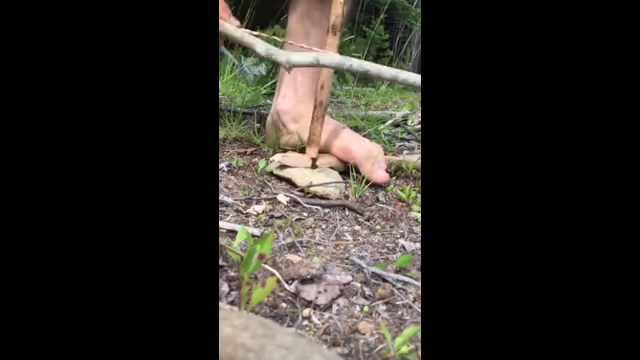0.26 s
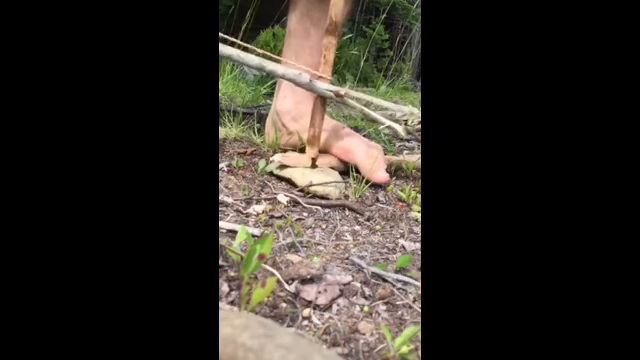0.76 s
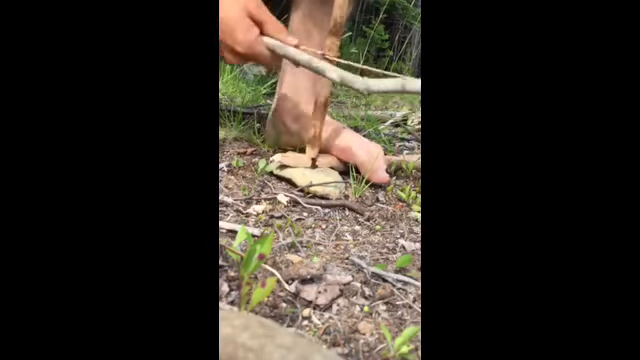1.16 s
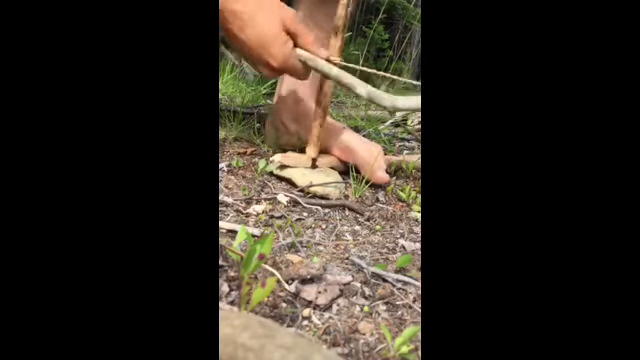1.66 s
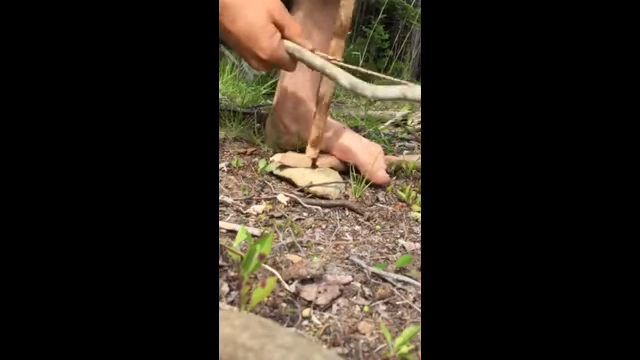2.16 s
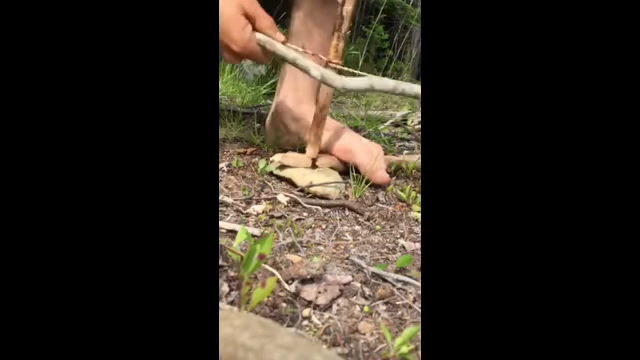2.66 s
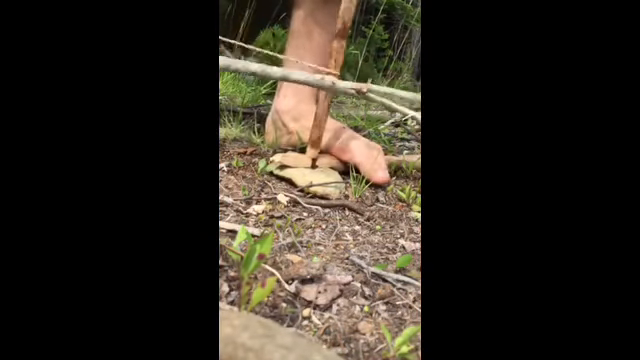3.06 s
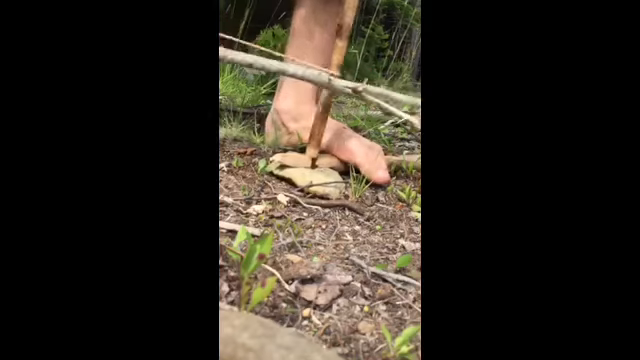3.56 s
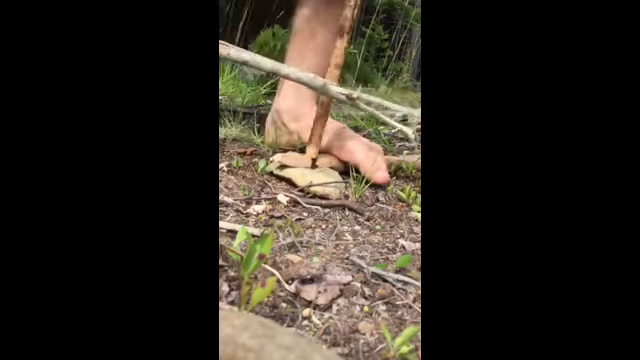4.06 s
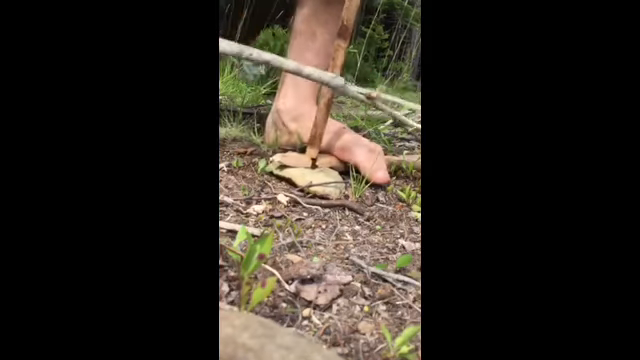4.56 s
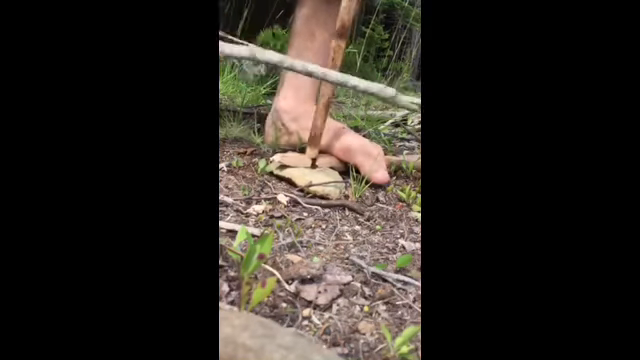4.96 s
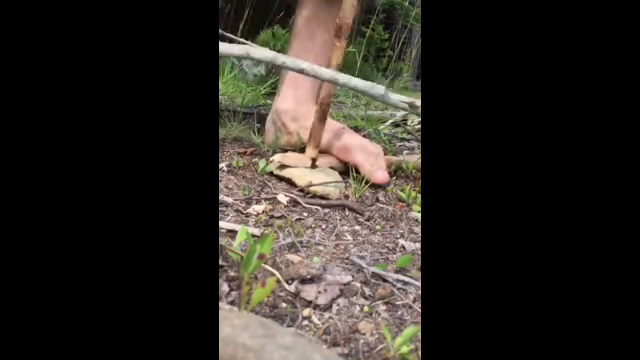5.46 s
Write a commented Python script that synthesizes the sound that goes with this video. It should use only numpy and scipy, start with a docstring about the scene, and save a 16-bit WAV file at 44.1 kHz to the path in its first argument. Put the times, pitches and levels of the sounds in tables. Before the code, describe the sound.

A bow drill worked quickly, heard very near and in mono. Four piercing squeaks come in the opening second and a half, with slower uneven strokes; then a regular scrubbing grind takes over, pulls harsher than pushes, pausing for an instant at each turn. Underneath are fluttering low thrums; late strokes end in loose wooden clacks. The woodland around is quiet, with barely any echo.

```python
"""Woodland, close by: a bow drill turns a wooden spindle in a hearth board, about four strokes a second.
Early on the smooth tip squeals by stick-slip at the spindle's resonance, later it only chirps.
Dry grinding stops at each turn of the bow: random slips excite wood resonances and hiss in the dust.
The wobbling spindle thrums the bow and board, rattles and knocks in its socket, and crumbs of wood crack.
The cord creaks, and faint echoes from trunks and still air lie behind, as filtered noise."""
import sys
import numpy as np
from scipy import signal
from scipy.fft import rfft, irfft
from scipy.io import wavfile

SR = 44100
rng = np.random.default_rng(int(sys.argv[2]) if len(sys.argv) > 2 else 0)


def materialize(psi):
    """Save the field psi as 16-bit PCM at rate SR to the path in sys.argv[1].

    A 1-D psi becomes a single channel; in a 2-D psi each row is a channel.
    """
    bounded = np.clip(np.atleast_2d(psi).T, -1, 1)
    quanta = np.round(bounded * 32767).astype(np.int16)
    wavfile.write(sys.argv[1], SR, quanta)


N = 251811


def undb(db):
    """Logarithmic level: decibels to amplitude gain."""
    return 10 ** (np.asarray(db) / 20)


def unit(x):
    """Power normalisation: scale to an rms of 1."""
    return x / np.sqrt(np.mean(x ** 2))


def clock():
    """Uniform sampling: the time of every sample in seconds."""
    return np.arange(N) / SR


def filtered(x, order, hz, kind="low"):
    """Linear filtering: a Butterworth response with its edge or edges at hz."""
    return signal.sosfilt(signal.butter(order, hz, kind, fs=SR, output="sos"), x)


def walk(rate):
    """Band-limited noise: a smooth random course of rms 1, varying up to about `rate` times a second."""
    return unit(filtered(rng.standard_normal(N), 2, rate))


def ring(x, hz, width):
    """Simple resonance: a second-order peak with gain 1 at its centre."""
    return signal.lfilter(*signal.iirpeak(hz, hz / width, fs=SR), x)


def body(x, modes):
    """Modal superposition: resonances (frequency, width, level) driven by one force."""
    return sum(undb(db) * ring(x, hz, width) for hz, width, db in modes)


def ring_through(x, hz, width):
    """Resonance of moving pitch: kicks of random phase build up a slow complex swing on a carrier."""
    kicks = x * np.exp(2j * np.pi * rng.random(N))
    swing = filtered(kicks, 1, width / 2)
    swing = filtered(swing, 1, 420)
    carrier = np.exp(2j * np.pi * np.cumsum(hz) / SR)
    return unit(np.real(swing * carrier))


def colour(x, points):
    """Spectral shaping: gain interpolated over log frequency between (frequency, level) points."""
    hz, db = np.transpose(points)
    bins = np.maximum(np.fft.rfftfreq(N, 1 / SR), 1)
    gain = undb(np.interp(np.log(bins), np.log(hz), db))
    return irfft(rfft(x) * gain, N)


def grains(rate, spread_db):
    """Shot noise: random clicks, about `rate` a second, of unequal size."""
    hits = rng.random(N) < rate / SR
    return hits * rng.standard_normal(N) * undb(spread_db * rng.standard_normal(N))


def burst(start, decay):
    """Exponential decay: a dying spray of noise from a sudden start."""
    age = clock() - start
    return (age >= 0) * np.exp(-np.abs(age) / decay) * rng.standard_normal(N)


# Bow strokes, push and pull in turn: (start [s], end [s], pressure [dB])
BOW_STROKES = [(-0.12, 0.126, 0), (0.171, 0.454, -2), (0.541, 0.829, -4), (0.886, 1.145, -2.5),
               (1.181, 1.433, -4), (1.501, 1.742, 0), (1.758, 2.009, .5), (2.029, 2.275, 0),
               (2.298, 2.547, 0.4), (2.563, 2.813, -0.5), (2.833, 3.074, .5), (3.107, 3.336, 0),
               (3.356, 3.602, 0), (3.621, 3.838, 0), (3.868, 4.119, 0), (4.138, 4.353, 0),
               (4.386, 4.617, .5), (4.644, 4.85, -.5), (4.877, 5.093, 0), (5.116, 5.322, -0.5),
               (5.344, 5.575, -0.5), (5.584, 5.802, -1)]


def bow():
    """Reciprocating drive: relative speed (0 at each turn of the bow), pull flag and pressure in dB."""
    t, speed, pulled, pressure_db = clock(), np.zeros(N), np.zeros(N), np.zeros(N)
    fastest = .53  # share of the stroke elapsed when the bow is fastest
    for k, (start, end, db) in enumerate(BOW_STROKES):
        on = (t > start) & (t < end)
        u = (t[on] - start) / (end - start)
        # warp the stroke so that the half-sine peaks at the fastest moment
        warped = u * (1 - fastest) / (u * (1 - fastest) + fastest * (1 - u))
        speed[on] = np.sin(np.pi * warped)
        pulled[on], pressure_db[on] = k % 2, db
    return speed, pulled, pressure_db


def turns(speed, top_hz):
    """Rotational modulation: the tip's lean presses once a turn, its oval shape twice a turn."""
    turns_hz = top_hz * speed ** .25 * (1 + .05 * walk(12))
    phase = 2 * np.pi * np.cumsum(turns_hz) / SR
    return 0.54 * np.cos(phase) + 1.0 * np.cos(2 * phase + 1)


# Part levels as the socket wears: (time [s], rattle [dB re thrum force], wood [dB], thrum [dB])
SOCKET_WEAR = [(0, -15, 0.5, -8), (0.698, -24, -3.5, -13.5), (1.551, -21, -2, -0.5), (3.5, -20, -1.5, 0.5),
               (5.3, -19.5, 1, 2)]


def wear():
    """Slow parameter drift: rattle, wood and thrum levels in dB, straight lines between the points."""
    s, *columns = np.transpose(SOCKET_WEAR)
    return [np.interp(clock(), s, c) for c in columns]


# Moments late in a pull when the cord slips on the spindle: (time [s])
CORD_SLIP_TIMES = [3.739, 4.32, 4.812, 5.276]


def slackening(slip_db=-9):
    """Loss of traction: a slipping cord lowers the force until just after the stroke ends."""
    t, loss_db = clock(), np.zeros(N)
    for s in CORD_SLIP_TIMES:
        end = min(stroke[1] for stroke in BOW_STROKES if stroke[1] > s)
        loss_db += slip_db * np.interp(t, [s - .004, s + .004, end, end + .02], [0, 1, 1, 0])
    return undb(loss_db)


def friction(speed, start_share, end_share):
    """Sliding friction: rubbing bites as soon as the tip moves, grows with speed and tapers as it slows."""
    moving = np.tanh(speed / .06)
    # part of the force that does not depend on speed
    share = np.where(np.gradient(speed) > 0, start_share, end_share)
    return moving * (share + (1 - share) * speed)


# Resonances of spindle and board:
# (frequency [Hz], width [Hz], level when pushed [dB], level when pulled [dB])
WOOD_MODES = [(1420, 42, -1.5, 1.5), (1527, 130, -5.5, -4.5), (2057, 93, -5.5, 1), (3070, 250, -1, -3),
              (4433, 270, -1, -3), (5574, 134, 2.5, 3.5), (8700, 830, 3, -1.5), (12690, 990, -10.5, -9.5)]
# Spectrum of the hiss in the wood dust:
# (frequency [Hz], level when pushed [dB], level when pulled [dB])
DUST_HISS = [(298, -13.5, -25), (800, -24.5, -32), (1200, -14, -22.5), (2210, -6, -8), (2215, -16, -24),
             (4100, -13.5, -12.5), (5280, -5.5, -16.5), (6000, -4.5, -11), (9600, -8, -9.5),
             (12400, -6.5, -7.5), (14000, -11.5, -19), (16000, -11.5, -12)]


def grinding(speed, pulled, bumps, gain, wood_db):
    """Random friction excitation: tiny slips ring the wood and hiss in dust, coloured by the lean each way."""
    pressure = undb(1.1 * bumps + 1.0 * walk(90) + 1.0 * walk(22))
    slips = unit(grains(6000 + 12000 * speed, spread_db=1.5)) * pressure * gain
    # dust hisses from the first movement; the wood needs more speed
    wood_force = friction(speed, start_share=.25, end_share=0.19) * undb(wood_db + 0.85 * walk(30))
    dust_force = friction(speed, start_share=0.58, end_share=0.56)
    out = 0
    for way, share in enumerate([1 - pulled, pulled]):
        modes = np.array(WOOD_MODES)[:, [0, 1, 2 + way]]
        dust = np.array(DUST_HISS)[:, [0, 1 + way]]
        out = out + body(slips * share * wood_force, modes)
        # random signs make the hiss independent of the wood sound
        out = out + colour(slips * share * dust_force * rng.choice([-1, 1], N), dust)
    return out


def stick_slip(swing, hz, bumps, chatter, second_db, third_db, fourth_db=-42):
    """Stick-slip oscillation: pressure bends the pitch, overtones grow with the limited swing."""
    waver_hz = 12 * walk(35) + 7 * walk(160) - 14 * bumps
    phase = 2 * np.pi * np.cumsum(hz + waver_hz) / SR
    # extra chatter before the squeal locks; it fades as the swing grows past about -30.5 dB
    chatter = chatter + 0.4 * np.exp(-swing / undb(-30.5))
    # missed slips shake both the swing and its phase
    shake_in = unit(ring(walk(130), 82, 81))
    shake_across = unit(ring(walk(200), 110, 44))
    shake = 1 + chatter * (shake_in + .6j * shake_across) / np.sqrt(2)
    swing, phase = swing * np.abs(shake), phase + np.angle(shake)
    limit = .54  # largest rms swing that friction can feed
    swing = swing / (1 + (swing / limit) ** 6) ** (1 / 6)
    flutter_db = 4.5  # random spread of each overtone's level
    overtones = 0
    for k, db in enumerate([second_db, third_db, fourth_db], 2):
        level = undb(db + flutter_db * walk(55))
        overtones = overtones + level * np.sin(k * phase + 0.37 * walk(140))
    return np.sqrt(2) * swing * (np.sin(phase) + overtones * (swing / 0.5) ** 0.27)


# Squeals of the polished tip, one curve for each of four early strokes:
# (time [s], pitch before waver [Hz], level before throb and chatter [dB])
SQUEAL_CURVES = [
    [(0.19, 3360, -51), (0.224, 3330, -32.5), (0.248, 3296, -34.5), (0.272, 3286, -11), (0.282, 3241, -6.5),
     (0.384, 3270, -10.5), (0.4, 3286, -18.5), (0.428, 3316, -18), (0.46, 3323, -56)],
    [(0.58, 3390, -52), (0.638, 3198, -16.5), (0.678, 3242, -25), (0.692, 3216, -15.5), (0.736, 3215, -24),
     (0.754, 3213, -13), (0.79, 3295, -30.5), (0.814, 3246, -22.5), (0.84, 3230, -53.5)],
    [(0.91, 3310, -55.5), (0.948, 3277, -26), (0.992, 3259, -6), (1.016, 3174, -25), (1.026, 3253, -14),
     (1.078, 3235, -5), (1.11, 3246, -51)],
    [(1.25, 3340, -42), (1.258, 3360, -44.5), (1.276, 3320, -18.5), (1.294, 3302, -11.5), (1.35, 3277, -19),
     (1.376, 3238, -15.5), (1.41, 3280, -45)],
]
# How each squeal slips: (chatter [0-1], throb with the turning [dB per unit of bump],
# second harmonic [dB], third harmonic [dB])
SQUEAL_SLIPPING = [(0.1, 2.3, -34.5, -29), (0.31, 1.5, -13, -20.5), (0.07, -2, -33.5, -25),
                   (0.18, 4, -26.5, -29)]


def squeals(bumps, fade_s=0.037):
    """Friction-driven self-oscillation: squeals throb with the turning; returns sound and mean swing."""
    t, swing = clock(), np.zeros(N)
    starts = [curve[0][0] for curve in SQUEAL_CURVES]
    which = np.maximum(np.searchsorted(starts, t) - 1, 0)
    chatter, throb_db, second_db, third_db = np.array(SQUEAL_SLIPPING)[which].T
    for curve in SQUEAL_CURVES:
        s, _, db = np.transpose(curve)
        fade = np.interp(t, [s[0] - fade_s, s[0], s[-1], s[-1] + fade_s], [0, 1, 1, 0])
        swing += undb(np.interp(t, s, db)) * fade
    s, hz, _ = np.concatenate(SQUEAL_CURVES).T
    pitch_hz = np.interp(t, s, hz)
    throbbing = swing * undb(throb_db * bumps)
    return stick_slip(throbbing, pitch_hz, bumps, chatter, second_db, third_db), swing


# Brief catches of the tip: (time [s], pitch before waver [Hz], level before chatter [dB], swell time [s])
TIP_CHIRPS = [(0.076, 3260, -33.5, 0.0087), (2.18, 3271, -31.5, 0.0075), (2.425, 3271, -31, 0.0095),
              (3.232, 3225, -34.5, 0.019), (3.484, 3273, -33.5, 0.01), (3.535, 3223, -24.5, 0.0093),
              (3.732, 3250, -29.5, 0.0012), (3.783, 3547, -41.5, 0.0026), (4.042, 3164, -26, 0.00223),
              (4.25, 3204, -31.5, .01)]


def chirps(bumps):
    """Transient stick-slip: the tip grips briefly, and the swing swells and dies as a hyperbolic secant."""
    t, swing = clock(), np.zeros(N)
    for s, _, db, swell in TIP_CHIRPS:
        swing += undb(db) / np.cosh(np.minimum(np.abs(t - s) / swell, 20))
    s, hz, _, _ = np.transpose(TIP_CHIRPS)
    return stick_slip(swing, np.interp(t, s, hz), bumps, chatter=0.054, second_db=-49, third_db=-41)


# Spindle resonance: (frequency when pushed [Hz], frequency when pulled [Hz], width [Hz]);
# both frequencies hold at 0.85 of full speed
SPINDLE_MODE = (3265, 3246, 74)


def spindle_ring(speed, pulled, bumps, gain):
    """Noise-driven resonance: slips make the spindle sing hoarsely and fitfully, flatter when it turns fast."""
    push_hz, pull_hz, width = SPINDLE_MODE
    bend_hz = 130 * (.85 - speed)
    hz = np.where(pulled, pull_hz, push_hz) + bend_hz + 40 * walk(30)
    slips = grains(1500 + 3000 * speed, spread_db=3.5) * undb(2 * bumps + 2 * walk(35))
    return gain * (0.68 * speed + 0.34 * speed ** 5) * ring_through(slips, hz, width)


# Low resonances of bow, board and ground: (frequency [Hz], width [Hz], level [dB])
THRUM_MODES = [(84.8, 17, 4.5), (126.2, 8.4, 4), (158.7, 11, 1), (290, 59, -12.5)]
# Resonances of the loose socket: (frequency [Hz], width [Hz], level [dB])
SOCKET_MODES = [(380, 52, -0.5), (654.3, 43, 3.5), (1010, 220, -8), (1460, 130, -13)]


def wobble(speed, bumps, gain, rattle_db, lag=.012):
    """Forced vibration: jolts thrum bow and board a little behind the stroke, and taps rattle the socket."""
    t = clock()
    shove = np.interp(t - lag, t, gain * speed)
    jolts = unit(grains(1500, spread_db=1.0) * undb(4 * bumps))
    thrum = filtered(body(jolts * shove, THRUM_MODES), 3, [52, 200], "band")
    taps = unit(grains(700, spread_db=4.5) * undb(4 * bumps)) * shove * undb(rattle_db)
    return thrum + ring(body(taps, SOCKET_MODES), 660, 670)


# Jumps and scuffs of the spindle in its socket, levels before the resonances:
# (time [s], clack [dB], thump [dB], decay [s])
SPINDLE_KNOCKS = [(1.203, -35, -21.5, 0.002), (1.234, -48, -21, 0.038), (1.414, -35, -14.5, .009),
                  (3.527, -18.5, -42, 0.0017), (3.736, -26, -26, 0.037), (4.04, -24.5, -46, 0.017),
                  (4.314, -24.5, -17, 0.016), (4.804, -23.5, -22.5, 0.017), (5.277, -15.5, -12.5, 0.013),
                  (5.684, -20.5, -39, 0.01)]


def knocks(wood_db=-6):
    """Impact excitation: each jump of the spindle clatters in the socket and thumps the board."""
    contacts = unit(grains(3500, spread_db=2))  # breaks the clack into separate touches
    clacks, thumps = np.zeros(N), np.zeros(N)
    for s, clack_db, thump_db, decay in SPINDLE_KNOCKS:
        spray = burst(s, decay)
        clacks += undb(clack_db) * spray * contacts
        thumps += undb(thump_db) * spray
    pushed_wood = [m[:-1] for m in WOOD_MODES]
    clatter = body(clacks, SOCKET_MODES) + undb(wood_db) * body(clacks, pushed_wood)
    return ring(clatter, 1500, 2200) + ring(body(thumps, THRUM_MODES), 110, 179)


# The loudest crumbs of wood that crack under the tip: (time [s], level before colouring [dB])
LOUD_CRACKS = [(0.513, -38.5), (1.715, -21.5), (2.197, -27), (2.801, -23.5), (3.154, -26), (3.333, -26),
               (3.731, -21), (3.783, -24), (4.807, -30), (5.276, -19)]


def cracks(speed, decay=0.00092, wood_db=-10):
    """Brittle fracture: crumbs snap, a few loudly and more at random while the tip turns, as bright ticks."""
    grit_per_s, grit_db = 12, -38  # random crumbs: rate at full speed, level before colouring
    fading = np.exp(-1 / (decay * SR))
    grit = signal.lfilter([1], [1, -fading], grains(grit_per_s * speed, spread_db=9.5))
    snaps = undb(grit_db) * grit * rng.standard_normal(N)
    snaps = snaps + sum(undb(db) * burst(s, decay) for s, db in LOUD_CRACKS)
    pushed_dust = np.array(DUST_HISS)[:, :2]
    pushed_wood = [m[:-1] for m in WOOD_MODES]
    return colour(snaps, pushed_dust) + undb(wood_db) * body(snaps, pushed_wood)


def cord(speed, bumps, hz=310, width_hz=150, level_db=-66):
    """Frictional creak: small slips of the winding cord, dulled by one resonance applied twice."""
    creaks = grains(600, spread_db=4) * undb(2 * bumps)
    dulled = ring(ring(creaks, hz, width_hz), hz, width_hz)
    return undb(level_db) * speed * unit(dulled)


def trees(x, echo_db, t60):
    """Diffuse scattering: faint echoes from the trunks around, convolved and dull in the treble."""
    t = clock()
    echoes = grains(900, spread_db=2) * undb(-60 * t / t60) * (t > .02)
    echoes = undb(echo_db) * echoes / np.sqrt(np.sum(echoes ** 2))
    return filtered(signal.fftconvolve(x, echoes)[:N], 2, 5000)


# Spectrum of still woodland air, its shape only: (frequency [Hz], relative density [dB])
AIR_SPECTRUM = [(20, -25), (45, -2.5), (80, -1), (130, 0.5), (230, -10), (500, -20.5), (1200, -26.5),
                (3000, -18), (8000, -25), (16000, -37)]


def woodland_air(level_db=-58.5):
    """Broadband background noise: shaped noise whose level drifts slightly."""
    noise = unit(colour(rng.standard_normal(N), AIR_SPECTRUM))
    return undb(level_db + 0.91 * walk(15)) * noise


def scene():
    """Common drive and superposition: the bow's motion governs the rubbing parts, and all parts add."""
    speed, pulled, pressure_db = bow()
    rattle_db, wood_db, thrum_db = wear()
    bumps = turns(speed, top_hz=26.78)  # spindle turns a second at full speed
    force = slackening()

    def by_way(push, pull):
        """Directional asymmetry: one value for pushes, another for pulls."""
        return np.where(pulled, pull, push)

    squeal, swing = squeals(bumps)
    # while the tip is locked in a squeal, the random slips weaken
    unlocked = undb(-7 * np.tanh((swing / 0.23) ** 2))
    # a pull grinds and rings harder than a push
    grind_gain = undb(by_way(-37, -32) + pressure_db) * force * unlocked
    ring_gain = undb(by_way(-43, -39) + 3.4 * pressure_db) * force  # 3.4 dB of ring per dB of pressure
    thrum_gain = undb(by_way(-21, -22.5) + thrum_db)
    drill = grinding(speed, pulled, bumps, grind_gain, wood_db) + squeal + chirps(bumps)
    drill = drill + spindle_ring(speed, pulled, bumps, ring_gain)
    drill = drill + wobble(speed, bumps, thrum_gain, rattle_db)
    drill = drill + knocks() + cracks(speed) + cord(speed, bumps)
    return (drill + trees(drill, echo_db=-49.5, t60=0.94) + woodland_air())[None]


def record(dry):
    """Even-order distortion: the microphone bends the loudest swings one way, a faint thump; the top is cut."""
    bend = .11 * (dry * dry) ** 3
    bent = dry + filtered(bend, 2, 24, "high")
    top_hz = 15850
    return signal.sosfilt(signal.ellip(10, .2, 70, top_hz, fs=SR, output="sos"), bent)


dry = scene()
out = record(dry)
materialize(out)
```